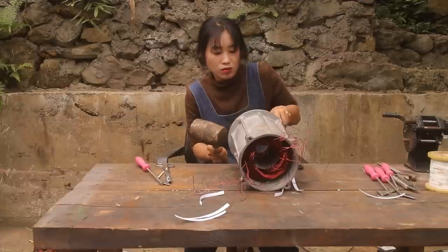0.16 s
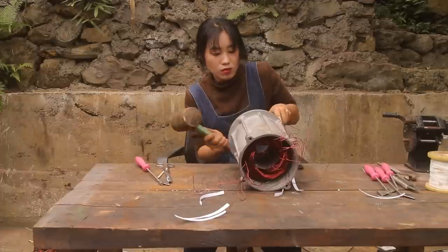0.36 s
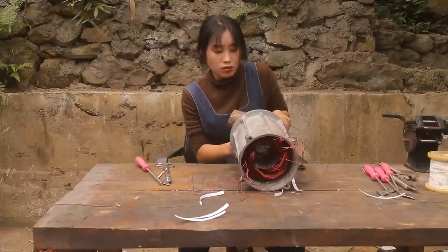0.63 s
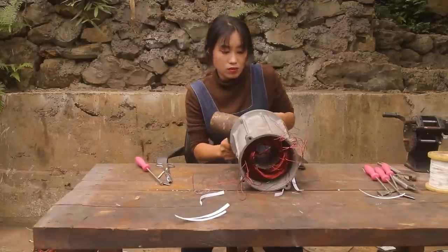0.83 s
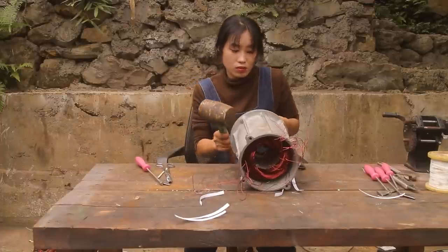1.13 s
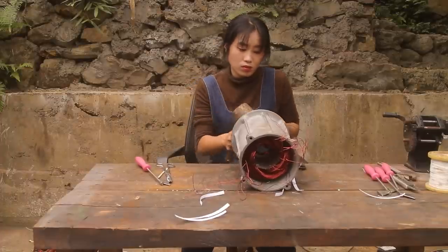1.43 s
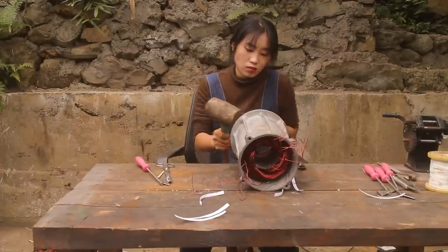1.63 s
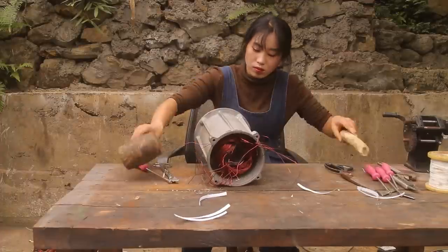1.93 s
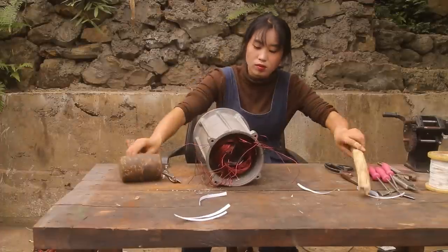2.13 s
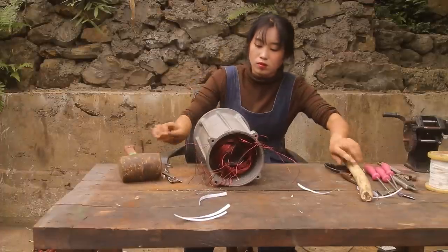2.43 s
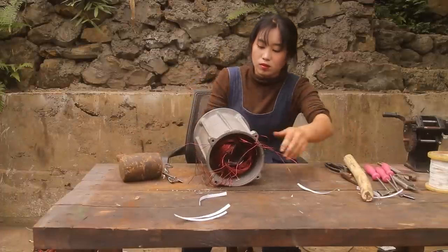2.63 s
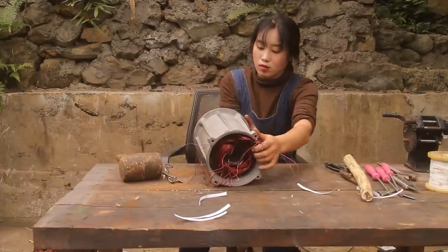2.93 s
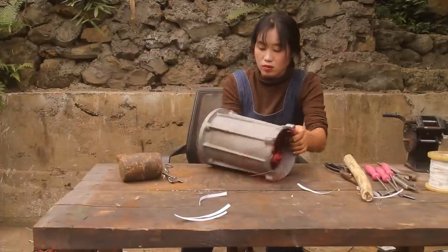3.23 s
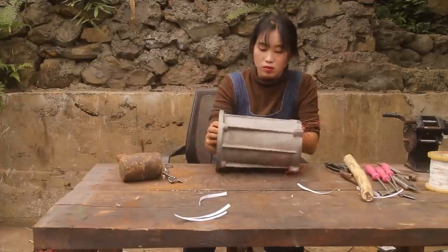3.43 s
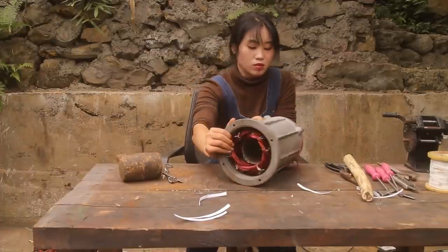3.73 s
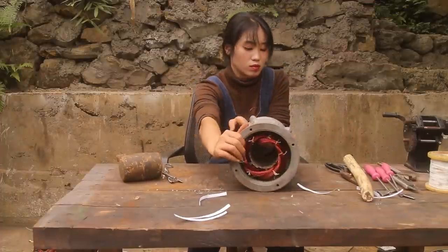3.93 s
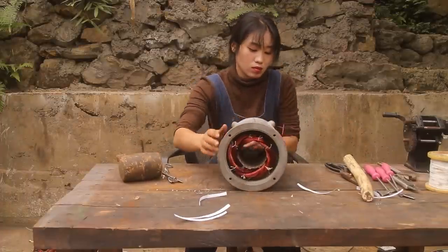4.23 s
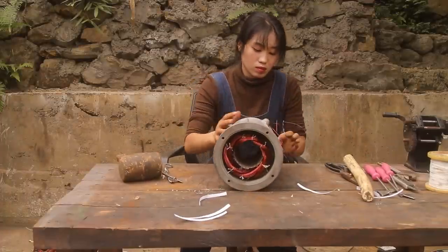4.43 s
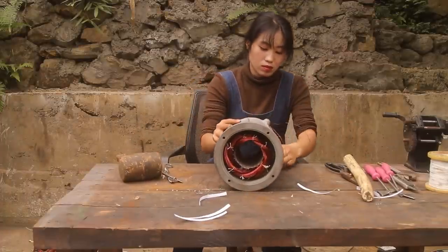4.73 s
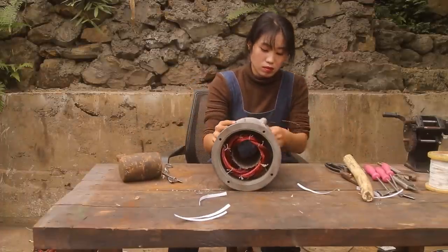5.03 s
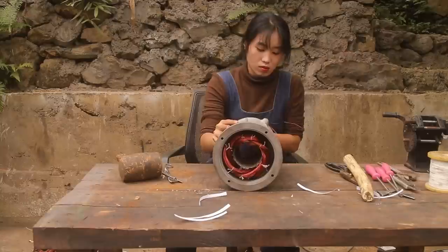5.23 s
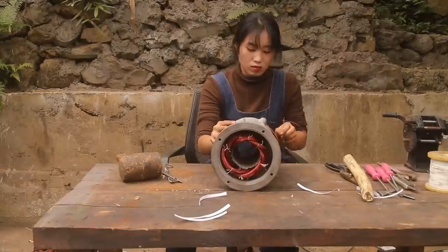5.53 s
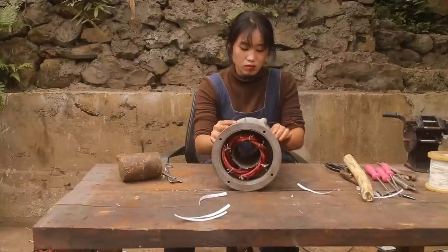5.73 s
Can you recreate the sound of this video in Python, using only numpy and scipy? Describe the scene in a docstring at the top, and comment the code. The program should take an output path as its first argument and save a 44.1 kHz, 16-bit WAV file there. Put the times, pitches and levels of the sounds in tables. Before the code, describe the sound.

Two sharp mallet cracks on metal, wooden tools clattering onto a bench, then a heavy metal housing scraped round with thumps and lightly fingered outdoors.

```python
"""Mallet, punch and motor housing on a yard bench

A wooden mallet taps a punch in a cast motor housing; mallet and punch are laid down on the planks.
Then the housing is dragged round on its ribs, thumps down and is fingered lightly.
Knocks ring banks of decaying modes in bench, wood and metal; rubs drive such modes with random clicks.
A stone wall answers with echoes and a short noise tail, over a steady outdoor hiss of shaped noise."""
import sys
import numpy as np
from scipy import signal
from scipy.fft import rfft, irfft, next_fast_len
from scipy.io import wavfile
from scipy.ndimage import uniform_filter1d

SR = 44100
rng = np.random.default_rng(int(sys.argv[2]) if len(sys.argv) > 2 else 0)


def store_wav(level_fs):
    """Save 16-bit WAV to argv[1]."""
    pcm = np.round(np.clip(np.atleast_2d(level_fs), -1, 1) * 32767)
    wavfile.write(sys.argv[1], SR, pcm.T.astype(np.int16))


N = 258867

# modes of the bench planks: (frequency [Hz], level [dB], t60 [s])
BENCH = [(179, -6, 0.041), (224.4, 5.5, 0.074), (225, -8, 0.15), (291.5, 10, 0.052), (322.6, 6.5, 0.09),
         (357, -4.5, 0.18), (400, -0.5, 0.029), (530, 9, 0.014), (745, -31, .05)]
# modes of the wooden tools: (frequency [Hz], level [dB], t60 [s])
WOOD = [(425, 6.5, 0.044), (479, -4.5, 0.18), (522, 6.5, 0.042), (693, 10.5, 0.02), (845, 6.5, 0.017),
        (1030, 5.5, 0.05), (1205, 6.5, 0.039), (1317, 7, 0.019), (1604, 10.5, 0.013), (1805, -6, 0.099),
        (2096, 4, 0.015), (2524, -3.5, 0.037), (2685, -34, 0.088)]
# deep ring under the knocks: (frequency [Hz], level [dB], t60 [s])
DEEP = [(125.6, 0, 0.27)]


def undb(db):
    """Gain of a dB value."""
    return 10 ** (np.asarray(db) / 20)


def unit(x):
    """Scaled to rms 1."""
    return x / np.sqrt(np.mean(x ** 2))


def band(x, lo_hz, hi_hz):
    """Band-pass."""
    sos = signal.butter(2, [lo_hz, min(hi_hz, 20000)], "band", fs=SR, output="sos")
    return signal.sosfilt(sos, x)


def along(table, hz):
    """A (frequency [Hz], value) table read on a log-frequency axis."""
    table_hz, values = np.transpose(table)
    return np.interp(np.log(np.maximum(hz, 1)), np.log(table_hz), values)


def coloured(x, table):
    """x shaped by a (frequency [Hz], level [dB]) spectrum."""
    size = next_fast_len(N)
    hz = np.arange(size // 2 + 1) * SR / size
    return irfft(rfft(x, size) * undb(along(table, hz)), size)[..., :N]


def walk(rate):
    """Smooth random levels: steps held 1 / rate s, averaged twice over that time."""
    hold = int(SR / rate)
    steps = np.repeat(rng.standard_normal(N // hold + 1), hold)
    return 2.47 * uniform_filter1d(uniform_filter1d(steps, hold), hold)[:N]


def gains(table):
    """Gain curves from the dB columns after a time column; silent outside the table."""
    t = np.arange(N) / SR
    s, *columns = np.transpose(table)
    return np.array([undb(np.interp(t, s, db, -150, -150)) for db in columns])


def swells(rows):
    """Gain curves of gestures: 12 dB under the peak one rise before it and one fall after it."""
    t = np.arange(N) / SR
    power = 0
    for s, rise, fall, *db in rows:
        shape_db = -12 * np.maximum((s - t) / rise, (t - s) / fall)
        power = power + undb(np.array(db)[:, None] + np.maximum(shape_db, -150)) ** 2
    return np.sqrt(power)


def add(track, s, sound, pan_db=0.):
    """Mixes a sound into the stereo track at s seconds; pan_db is left minus right."""
    i = int(s * SR)
    track[:, i:i + len(sound)] += undb([[pan_db / 2], [-pan_db / 2]]) * sound[:N - i]


def strike(modes, contact_ms, focus_hz, octave_db):
    """Ring after a half-sine push, peak 1; modes lose octave_db for each octave off the favoured pitch."""
    hz, db, t60 = np.transpose(modes)[:, :, None]
    t = np.arange(SR // 2) / SR
    level_chance, pitch_chance = rng.standard_normal((2, len(modes), 1))
    db = db + 1.5 * level_chance - octave_db * np.abs(np.log2(hz / focus_hz))
    hz = hz * (1 + 0.012 * pitch_chance)
    # neighbouring modes start in opposite directions
    sign = (-1) ** np.arange(len(modes))[:, None]
    ring = np.sum(sign * undb(db - 60 * t / t60) * np.sin(2 * np.pi * hz * t), axis=0)
    push = np.sin(np.linspace(0, np.pi, int(contact_ms * SR / 1000) + 3))
    ring = np.convolve(ring, push)[:len(t)]
    return ring / np.abs(ring).max()


def burst(lo_hz, hi_hz, t60):
    """A dying puff of band-passed noise, rms 0.5 before the decay."""
    t = np.arange(SR // 8) / SR
    return unit(band(rng.standard_normal(len(t)), lo_hz, hi_hz)) * undb(-60 * t / t60) / 2


def slips(rate, spread_db):
    """Irregular stick-slip clicks, rate per second on average, a few much larger than the rest."""
    size = undb(spread_db * rng.exponential(size=N)) * rng.standard_normal(N)
    return unit(size * (rng.random(N) < rate / SR))


def rub(modes, force, focus_hz=1000., octave_db=0.):
    """Modes driven by a running force; each swells and fades alone, and those near the favoured pitch lead."""
    out, power = 0, 0
    for hz, db, t60 in modes:
        radius, angle = undb(-60 / (t60 * SR)), 2 * np.pi * hz / SR
        share = undb(db - octave_db * np.abs(np.log2(hz / focus_hz)))
        poles = [1, -2 * radius * np.cos(angle), radius * radius]
        ring = signal.lfilter([0, 1], poles, force * undb(2.2 * walk(14)))
        out = out + share * unit(ring)
        power = power + share ** 2
    return out / np.sqrt(power)


def blows():
    """Mallet on punch, with its bounce: metal cracks and hisses, then bench and deep ring answer a little late."""
    # (time [s], crack [dB], hiss [dB], bench [dB], deep ring [dB], left minus right [dB])
    hits = [(0.4838, -5.5, -6.5, -19.5, -40, -6), (.494, -24, -35, -46, -24, 5),
            (0.7804, -43, -28.5, -55, -46, -4), (1.3813, -21.5, -17, -18.5, -28, -5)]
    # modes of punch in casting: (frequency [Hz], level [dB], t60 [s])
    punch = [(420, -8, .04), (720, -7, .04), (991, 0, .05), (1130, -5, .04), (1600, -9, .02),
             (2400, -1, .03), (2900, -8, .02), (3500, -10, .02), (4110, -11, .04), (5744, -9, .03),
             (7940, -8, .025), (8860, -13, .02)]
    out = np.zeros((2, N))
    for s, crack_db, hiss_db, bench_db, deep_db, pan_db in hits:
        add(out, s, undb(crack_db) * strike(punch, .06, 2000., 0.), pan_db)
        add(out, s, undb(hiss_db) * burst(930, 11800, 0.032), pan_db)
        add(out, s + 0.0023, undb(bench_db) * strike(BENCH, 1.34, 250., 1.6), -1.5)
        add(out, s + 0.0044, undb(deep_db) * strike(DEEP, 4.5, 126., 0.), -1.5)
    return out


def rattles():
    """Loose metal chatters after a jolt: dense clicks ring its modes, and the chatter dies away."""
    # (time [s], dull part [dB], bright part [dB], t60 [s], left minus right [dB])
    chatters = [(0.4825, -25, -29, 0.21, -8.5), (.78, -60, -55, 0.21, -3), (1.3774, -30, -40, 0.28, -8),
                (1.503, -40, -36.5, 0.092, -21.5), (4.069, -34, -32.5, 0.34, -12.5),
                (4.118, -32, -42, 0.093, -6), (4.77, -52, -33, 0.34, -4)]
    # dull and bright modes of the loose metal: (frequency [Hz], level [dB], t60 [s])
    loose, loose_bright = [(1000, -8, .04), (1950, -6, .03), (2330, -2, .045), (2420, 0, .045),
                           (2500, -3, .04), (3400, -14, .03), (4110, -7, .05)], [(5700, 0, .02), (6480, -3, .02), (7900, -4, .015)]
    out = np.zeros((2, N))
    t = np.arange(SR // 2) / SR
    force = slips(4000, 1.5)
    dull = rub(loose, force) + undb(-2.5) * unit(band(force, 360, 3100))
    bright = rub(loose_bright, force) + undb(-10.5) * unit(band(force, 5500, 10300))
    for s, dull_db, bright_db, t60, pan_db in chatters:
        chatter = (undb(dull_db) * dull + undb(bright_db) * bright)[int(s * SR):][:len(t)]
        envelope = undb(-60 * t / t60) * (1 - np.exp(-t / 0.0084))
        add(out, s, envelope * chatter, pan_db)
    return out


def thumps():
    """The housing lands on the planks: a push rings the bench, with a noisy slap, deep ring and bass puff."""
    # (time [s], bench [dB], contact [ms], favoured pitch [Hz], slap [dB], deep ring [dB])
    landings = [(1.413, -15, 3.2, 215, -25, -19.5), (1.441, -26.5, 1.3, 215, -35, -25),
                (1.742, -40, 3, 130, -55, -39.5), (3.222, -12.5, 1.6, 230, -24, -26.5),
                (3.241, -19.5, 1.4, 233, -34, -41), (3.341, -22, 2.3, 219, -22, -50),
                (3.387, -15, 1.7, 215, -44, -47), (3.456, -18, 1.6, 250, -20, -48),
                (3.541, -12, 1.6, 298, -17.5, -33), (3.553, -20, 1, 293, -32, -34),
                (3.614, -13.5, 1.9, 257, -25, -28.5), (3.729, -25, 1.2, 180, -17, -25.5),
                (3.901, -12.5, 1.65, 223, -16.5, -25.5), (4.053, -11.5, 2.8, 261, -15, -30.5)]
    out = np.zeros((2, N))
    for s, db, contact_ms, focus_hz, slap_db, deep_db in landings:
        add(out, s, undb(db) * strike(BENCH, contact_ms, focus_hz, 9.), -1.5)
        add(out, s, undb(slap_db) * burst(340, 940, 0.069), -2.5)
        add(out, s, undb(deep_db) * strike(DEEP, 3.6, 126., 0.), -1.5)
        add(out, s, undb(db - 7.0) * burst(70, 170, 0.11), -1.5)
    return out


def wood_knocks():
    """Wooden tools set down: their own modes and a short puff, with the bench and deep ring beneath."""
    # (time [s], wood [dB], contact [ms], favoured pitch [Hz], loss per octave off it [dB],
    #  bench [dB], deep ring [dB], left minus right [dB])
    set_downs = [(2.059, -17.5, 0.18, 570, 5, -34, -25, -3), (2.171, -9.5, 0.61, 620, 16, -18.5, -38.5, 3),
                 (2.184, -6, 0.13, 2340, 39, -15.5, -39, -5), (2.196, -18, 0.14, 1250, 18, -19, -50, 1),
                 (2.295, -7.5, 0.54, 1025, 58, -44, -22, 0), (2.587, -1.5, 0.59, 840, 0.5, -8, -52, -2.5),
                 (2.598, -5, 0.59, 1200, 11, -16, -51, -5), (2.621, -12, 0.74, 484, 5, -23, -59, 3),
                 (2.662, -22, .6, 483, 5, -25, -46, -6)]
    out = np.zeros((2, N))
    for s, db, contact_ms, focus_hz, octave_db, bench_db, deep_db, pan_db in set_downs:
        add(out, s, undb(db) * strike(WOOD, contact_ms, focus_hz, octave_db), pan_db)
        add(out, s, undb(db - 7.5) * burst(focus_hz / 3, focus_hz * 2, 0.016), pan_db)
        add(out, s, undb(bench_db) * strike(BENCH, 0.57, 310., 42.0), -1.5)
        add(out, s, undb(deep_db) * strike(DEEP, 1.9, 126., 0.), -1.5)
    return out


def clinks():
    """Small steel tools clink together: a very short push rings high modes."""
    # (time [s], level [dB], favoured pitch [Hz])
    touches = [(2.081, -27, 10700), (2.139, -22, 8000), (2.146, -35, 11000), (2.157, -38, 10000),
               (2.17, -42, 10000)]
    # modes of the steel tools: (frequency [Hz], level [dB], t60 [s])
    steel = [(5800, -10, .05), (8100, -5, .05), (9100, 0, .16), (10600, -8, .05), (11300, -9, .04),
             (12650, -1, .1), (13500, -9, .05), (14050, -4, .15), (14700, -3, .2)]
    out = np.zeros((2, N))
    for s, db, focus_hz in touches:
        add(out, s, undb(db) * strike(steel, .02, focus_hz, 13.0), -5.)
    return out


def ticks():
    """Small hard ticks of wire and grit on the casting: noise puffs two octaves wide."""
    # (time [s], level [dB], centre [Hz], left minus right [dB])
    specks = [(1.407, -34, 6500, -13), (1.508, -49, 6430, -4), (2.146, -18.5, 6960, -14),
              (2.181, -43, 2620, -7), (3.54, -19, 1590, -3), (3.635, -19, 8900, -17.5),
              (3.78, -16, 3900, -6), (3.945, -19.5, 3260, -5), (4.059, -20, 3260, -14),
              (4.075, -24, 6250, -17.5), (5.017, -35, 5000, -7), (5.147, -50, 2900, -4),
              (5.366, -29.5, 4000, -15), (5.534, -47, 3500, 3)]
    out = np.zeros((2, N))
    for s, db, hz, pan_db in specks:
        add(out, s, undb(db) * burst(.5 * hz, 2 * hz, 0.054), pan_db)
    return out


def drag_curves():
    """The housing dragged round on the planks: gains that follow the scrape, and the moving contact's pitches."""
    # (time [s], scrape [dB], shell pitch [Hz], ribs pitch [Hz])
    drag = [(2.98, -58, 1290, 2300), (3.055, -38, 1350, 2130), (3.119, -33.5, 1590, 2200),
            (3.179, -19.5, 1650, 2080), (3.225, -36.5, 1620, 2250), (3.256, -17.5, 1730, 2580),
            (3.31, -24.5, 1670, 2280), (3.35, -34.5, 1470, 2200), (3.45, -33, 1450, 2640),
            (3.514, -31, 1590, 3180), (3.564, -27.5, 1180, 2500), (3.626, -32.5, 1460, 2700),
            (3.706, -28.5, 1170, 2330), (3.75, -36.5, 1190, 2400), (3.85, -34, 1370, 3350),
            (3.918, -35.5, 1650, 2590), (3.954, -39, 1280, 2980), (4.04, -67, 1380, 2600)]
    # how each part follows the scrape: (level at a middling scrape [dB], gain per dB of scrape [dB])
    bench_follow, shell_follow, ribs_follow = (-30, .55), (-30, 1.09), (-31.5, 0.74)
    rim_follow, grit_follow = (-47.5, 1.6), (-31.5, 0.86)
    middling_db = -30
    s, scrape_db, *contact_hz = np.transpose(drag)
    follows = bench_follow, shell_follow, ribs_follow, rim_follow, grit_follow
    parts_db = [db + slope * (scrape_db - middling_db) for db, slope in follows]
    levels = gains(np.transpose([s, *parts_db]))
    pitches = [np.interp(np.arange(N) / SR, s, hz) for hz in contact_hz]
    return levels, pitches


def casting_rub(grains, shell, ribs, rim, ring, grit_level, shell_hz, ribs_hz):
    """Friction rings the casting: shell, ribs, rim and fins by stick-slip, the light touch by grit grains."""
    # modes of shell, ribs, rim, fins and of the fingered casting: (frequency [Hz], level [dB], t60 [s])
    shell_modes, ribs_modes, rim_modes = [(690, -6, .05), (850, -8, .05), (1090, -2, .07), (1220, -3, .06),
                                          (1320, -5, .05), (1470, -5, .05), (1615, -1, .05),
                                          (1690, -1, .06), (1800, -3, .06)], [(2075, 0, .07), (2225, -1, .06), (2430, -7, .04),
                                                         (2780, -5, .06), (3095, -1, .07), (3550, -8, .04),
                                                         (4020, -10, .04)], [(4540, 2, 0.026), (4620, -4, 0.03)]
    fin_modes, touch_modes = [(5550, -3, .03), (6170, -2, .04), (6450, 0, .03), (7040, -4, .03),
                              (7610, -1, .04), (8420, -2, .03)], [(2067, -1, 0.12), (3077, -4.5, 0.11), (4660, -9.5, 0.076)]
    # shell and ribs keep this share of their free ring time while pressed on the planks
    pressed = [1, 1, .55]
    force = slips(2500, 1.6) * undb(2. * walk(80))
    metal = shell * rub(np.array(shell_modes) * pressed, force, shell_hz, 24.0)
    metal = metal + ribs * rub(np.array(ribs_modes) * pressed, force, ribs_hz, 18.0)
    metal = metal + rim * rub(rim_modes, force) + ring * rub(touch_modes, grains[0])
    return metal + undb(-10.0) * grit_level * rub(fin_modes, force)


def rubbing():
    """Friction clicks feed bench, wood and casting; grit rasps at the contact."""
    # mallet rolling and sliding to rest: (time [s], wood [dB], bench [dB], grit [dB])
    roll = [(2.05, -49, -50, -60), (2.065, -34.5, -22.5, -62), (2.1, -33, -45, -52), (2.15, -32, -50, -41),
            (2.19, -18, -48, -52), (2.25, -25.5, -41, -55), (2.31, -26.5, -29.5, -55),
            (2.38, -53, -51.5, -73), (2.45, -47, -39.5, -74), (2.56, -40.5, -65, -65),
            (2.585, -56, -66, -29)]
    # hands shifting the housing: (time [s], rise [s], fall [s], bench [dB], rustle [dB])
    nudges = [(.08, 0.27, 0.26, -50, -74), (.25, 0.13, .1, -49, -52), (.35, 0.056, 0.055, -45.5, -47),
              (.92, 0.26, 0.05, -45.5, -53), (1.07, 0.082, 0.13, -45, -50), (1.34, 0.067, .05, -56, -48),
              (1.78, 0.17, 0.058, -51, -69)]
    # fingers on windings and casting:
    # (time [s], rise [s], fall [s], rustle [dB], grit [dB], ring [dB], bench [dB])
    fingers = [(4.2, 0.04, 0.14, -48.5, -56, -64, -61), (4.34, 0.11, .3, -47.5, -48.5, -65, -76),
               (4.626, 0.061, 0.05, -40.5, -38, -42, -62), (4.74, 0.14, .1, -43, -47, -64, -47),
               (4.87, 0.17, 0.077, -35.5, -39.5, -41.5, -54), (5.014, 0.018, 0.036, -40, -41, -61, -64),
               (5.06, 0.042, 0.035, -55, -42, -40, -64), (5.152, 0.027, 0.022, -35.5, -40.5, -45, -54),
               (5.254, 0.084, .12, -46, -43, -59, -62), (5.366, 0.015, 0.044, -34.5, -38, -56, -55),
               (5.46, .06, 0.13, -58, -48, -65, -63), (5.62, .05, 0.1, -50, -50, -67, -76)]
    # the rim grinds over loose grit: (time [s], rise [s], fall [s], level [dB])
    grinds = [(3.655, 0.014, 0.14, -30.5), (3.11, 0.045, 0.1, -38)]
    # spectrum of the grit: (frequency [Hz], level per Hz [dB])
    grit_spectrum = [(240, -47), (400, -8.5), (1400, -13), (1650, -6), (1930, -15.5), (2090, -4.5),
                     (4650, -8), (5110, -4.5), (8370, -11.5), (16000, -25.5)]

    wood, roll_bench, roll_grit = gains(roll)
    (drag_bench, shell, ribs, rim, drag_grit), (shell_hz, ribs_hz) = drag_curves()
    grind = swells(grinds)[0]
    drag_grit = drag_grit + grind
    hand_bench, hand_rustle = swells(nudges)
    finger_rustle, finger_grit, ring, finger_bench = swells(fingers)

    # each port of the microphone hears its own mix of the scattered grit
    grains = slips(7000, 2.) + 1.1 * np.array([slips(7000, 2.), slips(7000, 2.)])
    grit = coloured(grains * undb(1.8 * walk(60)), grit_spectrum)
    rasp, hiss = unit(band(grit, 400, 4300)), unit(band(grit, 5200, 19000))
    metal = casting_rub(grains, shell, ribs, rim, ring, drag_grit + finger_grit, shell_hz, ribs_hz)

    # the broad rasp fills the gaps between the modes
    gaps = undb(2.5) * np.sqrt(shell * ribs)
    broad = (gaps + hand_rustle + finger_rustle + undb(-33.0) * wood) * rasp
    broad = broad + (drag_grit + roll_grit) * hiss
    broad = broad + finger_grit * unit(band(grains, 4000, 12000))
    broad = broad + grind * unit(band(grit, 3000, 4250))

    bench = rub(BENCH, slips(800, 1.5))
    thrum = rub(BENCH + DEEP, slips(300, 1.1), 131.0, 15.0)
    thrum_level = undb(-11.5) * drag_bench + undb(-4.0) * (hand_bench + finger_bench)
    thrum_level = thrum_level + undb(-17.0) * finger_rustle
    low = (roll_bench + drag_bench + hand_bench + finger_bench) * bench + thrum_level * thrum
    timber = wood * rub(WOOD, slips(2500, 1.5))

    # all three lean right, by these left and right levels in dB
    low = undb([[-.7], [.7]]) * low
    contact = undb([[-2.], [2.]]) * (metal + broad)
    return low + contact + undb([[-1.], [1.]]) * timber


def wobble():
    """The bench wobbles on its legs after heavy moves: each jolt rings two low modes of the whole bench."""
    # (time [s], sway [dB], bounce [dB])
    jolts = [(.49, -50, -56), (1.39, -44.5, -48), (2.14, -66, -47), (2.3, -65, -40), (2.47, -68, -46.5),
             (3.25, -65, -50), (3.6, -56, -49), (3.73, -58, -44), (3.92, -55, -43), (4.061, -48, -47),
             (4.64, -62, -55)]
    # one mode each: (frequency [Hz], t60 [s])
    sway, bounce = (40, 1.55), (78.2, 1)
    rise_s = 0.016
    out, t = np.zeros((2, N)), np.arange(SR) / SR
    for s, *levels in jolts:
        for db, (hz, t60) in zip(levels, (sway, bounce)):
            mode_hz = hz * (1 + .03 * rng.standard_normal())
            ring = np.sin(2 * np.pi * mode_hz * t) * (1 - np.exp(-t / rise_s))
            add(out, s, undb(db - 60 * t / t60) * ring, -1.5)
    return out


def yard(dry):
    """A few slaps off bench and wall, then a short diffuse tail that differs left and right in the treble."""
    # (delay [ms], left [dB], right [dB])
    echoes = [(4.416, -14, -9), (10.49, -21.5, -14), (15.15, -17.5, -15), (23.57, -8, -13),
              (31.03, -57, -30)]
    tail_db, t60_low_s, t60_high_s = -2.5, 0.18, 0.3
    t = np.arange(SR // 2) / SR
    mid, side = rng.standard_normal((2, len(t)))
    side = signal.sosfilt(signal.butter(2, 800, "high", fs=SR, output="sos"), side)
    noise = mid + side * np.array([[1], [-1]])
    low = signal.sosfilt(signal.butter(1, 1500, fs=SR, output="sos"), noise)
    tail = low * undb(-60 * t / t60_low_s) + (noise - low) * undb(-60 * t / t60_high_s)
    tail = tail * (1 - np.exp(-t / 0.0021))
    response = undb(tail_db) * tail / np.sqrt(np.sum(tail ** 2) / 2)
    for ms, left_db, right_db in echoes:
        response[0, int(ms * SR / 1000)] += undb(left_db)
        # each slap reaches the right 0.3 ms later
        response[1, int((ms + .3) * SR / 1000)] += undb(right_db)
    mono = dry.mean(axis=0, keepdims=True)
    return dry + signal.fftconvolve(mono, response, axes=1)[:, :N]


def air():
    """Steady outdoor hiss: shaped noise, alike left and right in the bass, swelling slowly."""
    # spectrum of the hiss: (frequency [Hz], level per Hz [dB])
    air_spectrum = [(15, -42), (28, -8), (50, -3), (317, -3), (416, -1), (489, -3.5), (695, -1), (840, -5),
                    (1230, -1), (1940, -4), (3340, -5.5), (4870, -11.5), (8140, -11.5), (12200, -18.5),
                    (16000, -28.5)]
    # likeness of the two sides: (frequency [Hz], left-right correlation)
    air_alike = [(30, 0.38), (125, 0.87), (300, 0.67), (1000, 0.097), (3000, 0.022), (16000, 0.038)]
    level_db = -44.5
    size = next_fast_len(N)
    alike = np.clip(along(air_alike, np.arange(size // 2 + 1) * SR / size), 0, 1)
    mid, side = rfft(rng.standard_normal((2, size)))
    mid = irfft(mid * np.sqrt(1 + alike), size)[:N]
    side = irfft(side * np.sqrt(1 - alike), size)[:N]
    hiss = unit(coloured(np.array([mid + side, mid - side]), air_spectrum))
    swell_db = .7 * walk(2)
    return hiss * undb(level_db + swell_db + np.array([[-1.], [1.]]))


def scene():
    """Everything on the bench in the yard, over the air; small bodies radiate little deep bass."""
    knocks = blows() + rattles() + thumps() + wood_knocks() + clinks() + ticks()
    bass_cut = signal.butter(4, 100, "high", fs=SR, output="sos")
    things = signal.sosfilt(bass_cut, yard(knocks + rubbing()))
    # the bench stands right of the microphone, so the left port hears it two samples late
    things = np.array([np.roll(things[0], 2), things[1]])
    return undb(-4.0) * things + wobble() + air()


def record(dry):
    """The microphone dips near 5 kHz, rounds the highest peaks, and the top is cut steeply."""
    top_hz = 15900
    dip = signal.lfilter(*signal.iirpeak(5050, 6., SR), dry)
    rounded = .8 * np.tanh((dry - .4 * dip) / .8)
    return signal.sosfilt(signal.ellip(10, .2, 80, top_hz, fs=SR, output="sos"), rounded)


dry = scene()
out = record(dry)
store_wav(out)
```